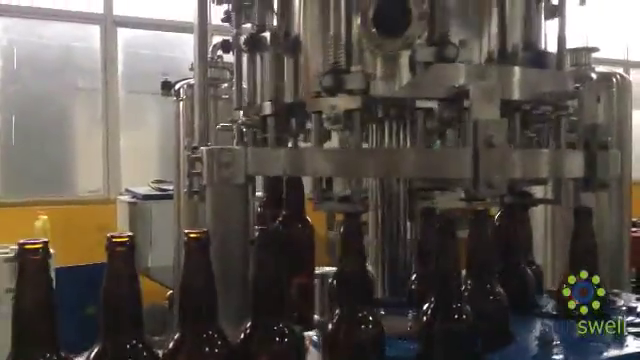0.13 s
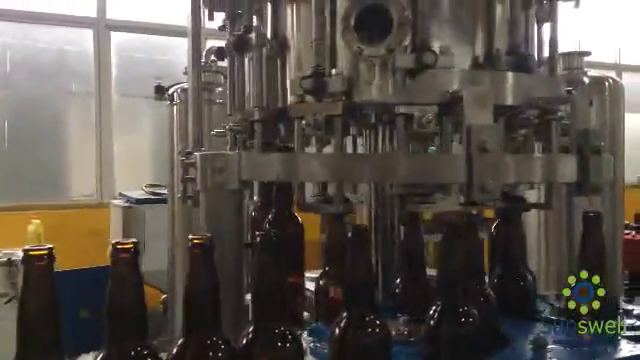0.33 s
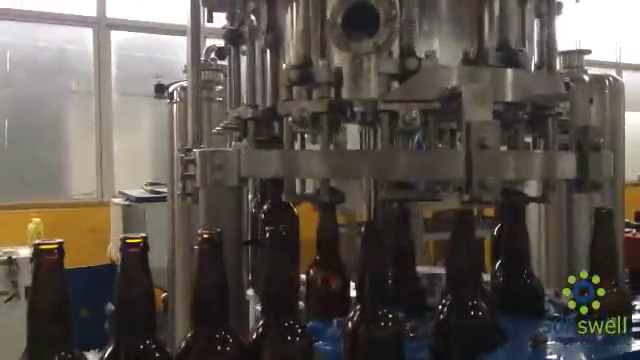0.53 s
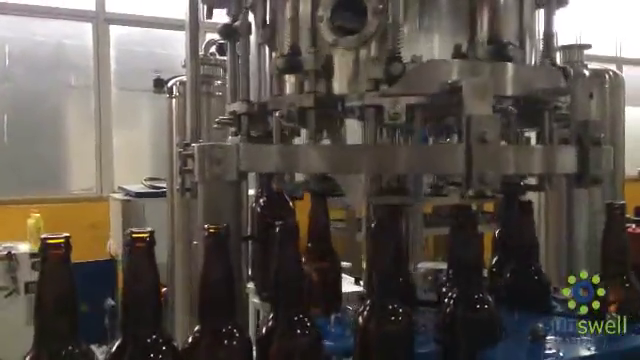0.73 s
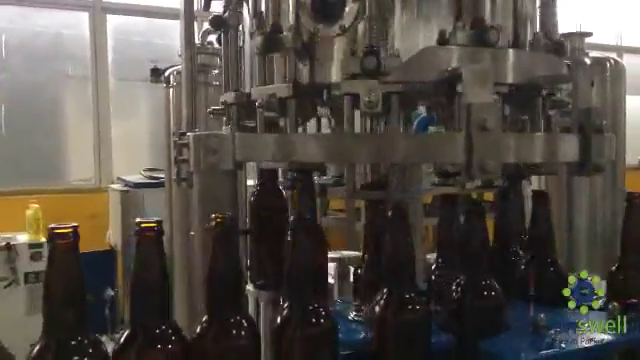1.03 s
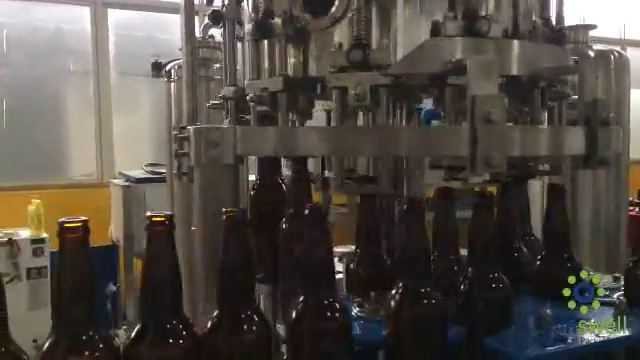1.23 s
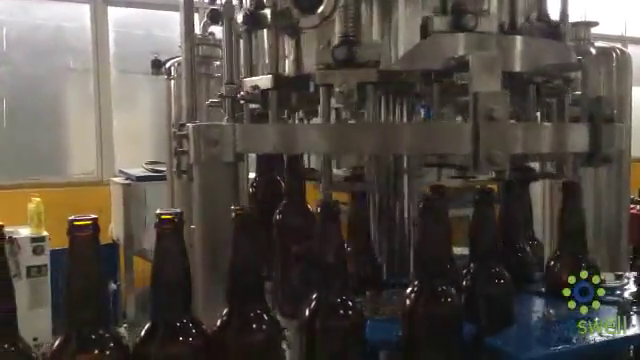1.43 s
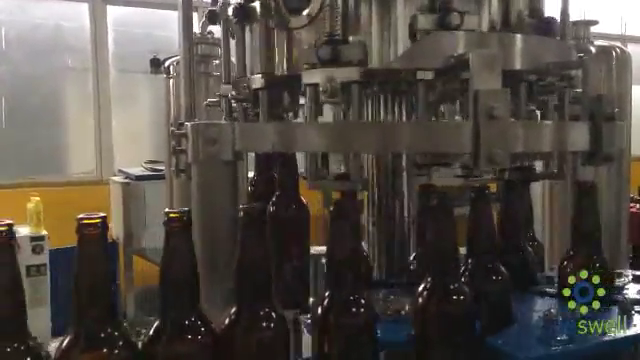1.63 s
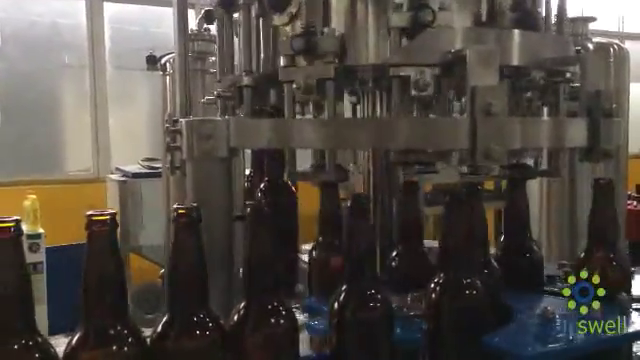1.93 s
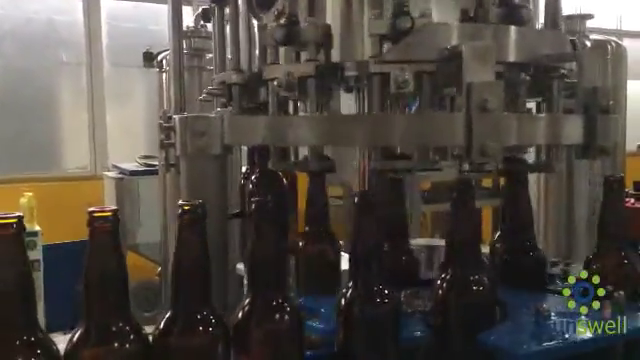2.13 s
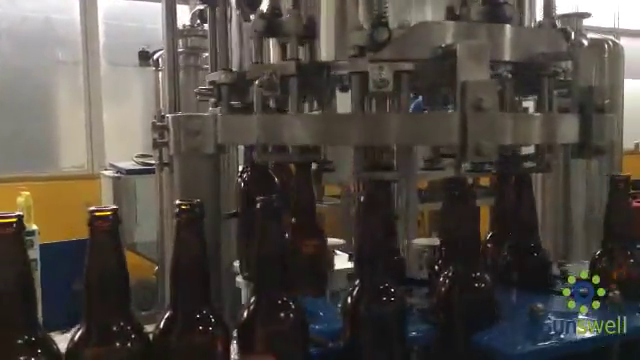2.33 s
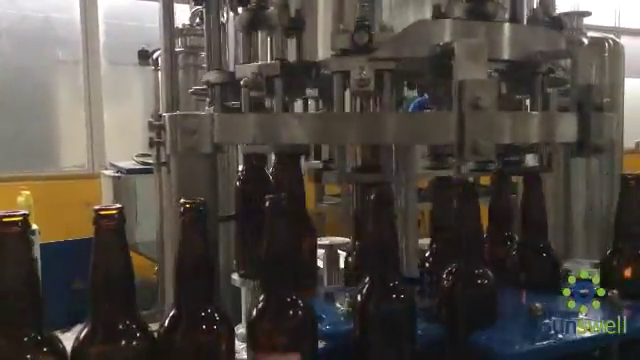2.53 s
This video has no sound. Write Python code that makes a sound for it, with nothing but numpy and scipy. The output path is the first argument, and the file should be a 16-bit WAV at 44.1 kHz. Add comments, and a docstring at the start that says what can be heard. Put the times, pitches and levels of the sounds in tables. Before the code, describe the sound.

Glass bottles clink close by: a rapid clattering cluster at 0.16-0.22 s, a strong ringing knock at 1.2 s, another cluster at 2.2-2.36 s, with weaker taps and faint jostling between. High steel pings with brief air puffs come at 1.05 and 2.6 s. Throughout, air and spray hiss brightly with faint whistles over unsteady motor hum and low rumble, in a weakly echoing hard-walled hall, mono.

```python
"""Glass bottles knock and ring close to the microphone, about once a second, as a filling machine runs.
Twice a steel part of the filler snaps over with a high ping and a puff of air; other bottles jostle faintly.
Blows are dying sines with a burst of contact noise, and a hard-walled hall answers them weakly.
Behind them lie the shaped noise of air and spray, faint whistles, a rumble and the unsteady hum of the drive."""
import sys
import numpy as np
from scipy import signal
from scipy.fft import rfft, irfft
from scipy.io import wavfile
from scipy.ndimage import uniform_filter1d

SR = 44100
rng = np.random.default_rng(int(sys.argv[2]) if len(sys.argv) > 2 else 0)


def unload_audio(sound):
    """Save the sound as a 16-bit wav file, at the path given as the first command line argument."""
    columns = np.transpose(np.atleast_2d(sound))
    # keep every value between -1 and 1, then stretch to whole-number steps
    steps = np.round(np.clip(columns, -1, 1) * 32767)
    wavfile.write(sys.argv[1], SR, steps.astype(np.int16))


N = 119070  # 2.7 s

# bottle collisions: start_s, ring_db, knock_db, tilt_db (per octave, positive favours the treble), crack_db
COLLISIONS = [(.1625, -21.5, -19, 13, -22), (.1716, -18, -13.5, 3, -4.5), (.1872, -25, -50, 13, -25),
              (.195, -15.5, -42, -3, -30), (.203, -21, -27, 3, -21), (0.2204, -19, -42, -5, -28),
              (.3576, -29.5, -35, 11, -19.5), (.553, -33, -23.5, 0, -36), (.65, -37, -30, -2, -36),
              (.9792, -48, -35, 2, -23), (1.1812, -33, -15.5, 19, -10), (1.1862, -9, -21, -5, -7.5),
              (1.226, -47, -25, 1, -36), (1.287, -26.5, -24.5, -4, -32), (1.495, -24, -42, -16, -36),
              (1.69, -27, -25.5, -8, -34), (1.978, -32, -22.5, -4, -39), (2.1960, -17.5, -11.5, 6, -9),
              (2.238, -28, -30, -4, -34), (2.2852, -21.5, -34, 0, -24), (2.312, -18.5, -37, -6, -34),
              (2.342, -22, -27, 4, -32), (2.364, -31, -46, 14, -32)]
# ringing modes of two touching bottles: pitch_hz, level_db (within the ring), t60_s
GLASS_MODES = [(2856, -1.5, .27), (3459, 0, .28), (2885, -12, .1), (3410, -12, .1), (4490, -17, .1),
               (5170, -5, .075), (5310, -4, .075), (6660, -10, .07), (6760, -10, .08), (8520, -23, .06),
               (10900, -27, .05)]
DAMPING_DB = -14  # a contact of this strength halves the ring that is still sounding
CONTACT_S = 0.0032  # decay time constant of the crack between bottles


def bottles():
    """Each collision damps the old ring, then cracks, knocks and sets the glass ringing anew."""
    glass, blows = np.zeros(N), np.zeros(N)
    for start_s, ring_db, knock_db, tilt_db, crack_db in COLLISIONS:
        glass[round(start_s * SR):] /= 1 + amp(ring_db - DAMPING_DB)
        add(glass, start_s, amp(ring_db) * ring(GLASS_MODES, 1, tilt_db))
        blow = amp(knock_db) * knock(0.96) + amp(crack_db) * crack(CONTACT_S)
        add(blows, start_s, blow)
    return glass + blows


# damped modes of a bottle held against the guide: pitch_hz (before the pitch factor), level_db (relative)
KNOCK_MODES = [(950, -17), (1335, -8.5), (1530, -3.5), (1745, -6.5), (1810, -2.5), (2040, -10)]
KNOCK_T60_S = .07


def knock(pitch):
    """The short, dull body of a collision: damped modes that all die alike."""
    modes = [(hz, level_db, KNOCK_T60_S) for hz, level_db in KNOCK_MODES]
    return ring(modes, pitch)


# colour of the contact crack: pitch_hz, level_db (relative)
CRACK_COLOUR = [(400, -22.5), (1500, -4.5), (2300, -7.5), (3200, 0), (5500, -1), (7000, -5), (9000, -5.5),
                (15000, -13)]


def crack(decay_s):
    """The brief noisy contact of two hard things: coloured noise under an exponential decay."""
    t = np.arange(SR // 2) / SR
    rough = unit(colour(rng.standard_normal(len(t)), CRACK_COLOUR))
    return rough * np.exp(-t / decay_s)


RING_RISE_S = 0.00043  # time constant of the onset


def ring(modes, pitch, tilt_db=0, split_hz=0):
    """Dying sines after a blow, tilted towards the treble or the low modes; split modes beat."""
    t = np.arange(SR // 2) / SR
    first_hz = modes[0][0]
    out = np.zeros(len(t))
    for hz, level_db, t60_s in modes:
        level = amp(level_db + tilt_db * np.log2(hz / first_hz))
        decay = np.exp(-np.log(1000) * t / t60_s)
        out += level * decay * np.sin(2 * np.pi * hz * pitch * t)
    rise = 1 - np.exp(-t / RING_RISE_S)
    beat = np.cos(np.pi * split_hz * t)  # turns each sine into a pair split_hz apart
    return out * rise * beat


# snaps of the steel part: start_s, level_db, pitch_hz, gap_hz (within each pair of modes), t60_s
PING_EVENTS = [(1.0462, -6.5, 5240, 45, 0.22), (2.5966, -8.5, 5329, 5.5, 0.29)]
# modes of the steel part: pitch_ratio, level_db (relative)
STEEL_MODES = [(0.998, 1), (1.012, -24), (1.763, -19), (2.008, -14), (2.38, -19)]
SNAP_DB, SNAP_S = -8, 0.005  # contact crack: level against the ping, decay time constant
# air let out: start_s, length_s, level_db
AIR_PUFFS = [(1.038, 0.055, -27), (2.592, 0.073, -23)]
# colour of the puffs: pitch_hz, level_db (relative)
PUFF_COLOUR = [(500, -27), (1500, -5.5), (2900, 13), (4500, 0), (7000, -4), (11000, 2.5), (15000, -20)]


def filler():
    """A steel part snaps over and its paired modes ring; air escapes with it as shaped noise."""
    out = np.zeros(N)
    for start_s, level_db, pitch_hz, gap_hz, t60_s in PING_EVENTS:
        modes = [(ratio, mode_db, t60_s) for ratio, mode_db in STEEL_MODES]
        ping = ring(modes, pitch_hz, split_hz=gap_hz)
        snap = amp(SNAP_DB) * crack(SNAP_S)
        add(out, start_s, amp(level_db) * (ping + snap))
    for start_s, length_s, level_db in AIR_PUFFS:
        air = unit(colour(rng.standard_normal(N), PUFF_COLOUR))[:int(length_s * SR)]
        swell = signal.windows.tukey(len(air), .5)
        add(out, start_s, amp(level_db) * air * swell)
    return out


JOSTLE_PER_S, JOSTLE_DB, JOSTLE_SPREAD_DB = 45, -40.5, 3.5  # mean rate, level, scatter of strength
JOSTLE_KNOCK_DB, JOSTLE_CRACK_DB = 2.5, 7.5  # against the level of the jostle


def jostle(count=10):
    """Bottles of slightly different pitch touch lightly at random on the conveyor."""
    out = np.zeros(N)
    for _ in range(count):
        struck = rng.random(N) < JOSTLE_PER_S / count / SR
        strength = amp(JOSTLE_SPREAD_DB * np.minimum(rng.exponential(1, N), 3))
        pitch = 1 + .025 * rng.uniform(-0.564, 1)
        touch = ring(GLASS_MODES, pitch, tilt_db=-2)
        touch += amp(JOSTLE_KNOCK_DB) * knock(pitch)
        touch += amp(JOSTLE_CRACK_DB) * crack(CONTACT_S)
        out += signal.oaconvolve(struck * strength, touch)[:N]
    return amp(JOSTLE_DB) * out


# hiss of the air jets and the spray, before its swell: pitch_hz, density_db (per Hz)
HISS_DENSITY = [(20, -110), (1000, -90.5), (2200, -70), (2850, -60), (3550, -59.5), (3900, -63.5),
                (4480, -60), (4750, -62), (5150, -60), (6300, -60.5), (7200, -64), (8400, -59.5),
                (10000, -60), (10700, -60.5), (11200, -59.5), (12200, -64), (13500, -59), (14400, -63.5),
                (15400, -63)]
# swell of the hiss: start_s, level_db
HISS_SWELL = [(0, 0.5), (.3, 0), (.45, -1.8), (.53, 0.9), (.8, .5), (1.0, .5), (1.1, 1.5), (1.25, -0.1),
              (1.42, -1), (1.6, 0), (1.8, -0.2), (1.97, 0.9), (2.15, 0.3), (2.35, -0.5), (2.47, -1.8),
              (2.56, 1), (2.7, -1)]
SPATTER_PER_S, SPATTER_DB = 250, -31  # mean rate of droplets, rms level before the swell
SPATTER_SPREAD_DB = -2  # scatter of droplet strength, downward
TREBLE_FROM_HZ, TREBLE_SWELL = 7500, 0.91  # the top of the hiss follows only this share of the swell


def spray():
    """Air and water hiss as noise that swells a little; random droplets spatter as tiny cracks."""
    swell_db = np.interp(np.arange(N) / SR, *np.transpose(HISS_SWELL))
    landed = rng.random(N) < SPATTER_PER_S / SR
    strength = amp(SPATTER_SPREAD_DB * np.minimum(rng.exponential(1, N), 4))
    drops = signal.oaconvolve(landed * strength, crack(decay_s=0.00092))[:N]
    air = noise(HISS_DENSITY, patchy_db=1.2) + amp(SPATTER_DB) * unit(drops)
    high_pass = signal.butter(2, TREBLE_FROM_HZ, "high", fs=SR, output="sos")
    treble = signal.sosfiltfilt(high_pass, air)
    return amp(swell_db) * (air - treble) + amp(TREBLE_SWELL * swell_db) * treble


# faint whistles of the air jets: pitch_hz, width_hz, level_db (rms)
JET_WHISTLES = [(4030, 25, -41), (4250, 40, -43.5), (4380, 77, -40)]


def whistles():
    """Narrow, fuzzy tones in the escaping air: sines whose level and phase wander."""
    t = np.arange(N) / SR
    out = np.zeros(N)
    for pitch_hz, width_hz, level_db in JET_WHISTLES:
        wander = drift(width_hz / 2) + 1j * drift(width_hz / 2)
        out += amp(level_db) * (wander * np.exp(2j * np.pi * pitch_hz * t)).real
    return out


# hum of the mains and of the drive: pitch_hz, level_db (rms of the steady part), unsteadiness (share)
HUM_LINES = [(99.8, -54, .4), (145, -57, .6), (526.8, -41.5, .25), (551, -51, .4), (575, -48, .3),
             (602.3, -45.2, .3), (626, -46, .25), (827, -56.5, .5)]
WAVER_HZ = 3  # how fast the hum wavers
# low rumble of the line, before its level curve: pitch_hz, density_db (per Hz)
BASS_DENSITY = [(5, -125), (22, -94), (35, -97), (55, -75.5), (120, -73.5), (165, -65.5), (270, -75),
                (450, -75.5), (2000, -110)]
# level of the low rumble: start_s, level_db
BASS_SWELL = [(0, -2), (.16, 4.5), (.4, 0.5), (.8, 2.5), (1.1, -2), (1.38, -1), (1.58, 2.5), (1.9, 5.5),
              (2.2, -0.5), (2.5, 0), (2.62, 1.5)]
# steady noise of the machinery: pitch_hz, density_db (per Hz)
MACHINE_DENSITY = [(20, -100), (150, -79), (280, -70), (430, -71), (600, -64.5), (780, -68.5),
                   (1150, -67.5), (1450, -66), (1850, -70.5), (2150, -69), (4000, -87.5), (16000, -100)]


def drive():
    """Unsteady lines of the motor and gears, sines wavering about a steady part, over rumbling noise."""
    t = np.arange(N) / SR
    hum = np.zeros(N)
    for pitch_hz, level_db, unsteadiness in HUM_LINES:
        waver = np.sqrt(2) + unsteadiness * (drift(WAVER_HZ) + 1j * drift(WAVER_HZ))
        line = np.exp(2j * np.pi * (pitch_hz * t + rng.random()))
        hum += amp(level_db) * (waver * line).real
    bass_db = np.interp(t, *np.transpose(BASS_SWELL))
    bass = amp(bass_db) * noise(BASS_DENSITY, patchy_db=1)
    return hum + bass + noise(MACHINE_DENSITY, patchy_db=2.5)


# decay of the hall: pitch_hz, t60_s
HALL_DECAY = [(100, 0.39), (1500, 1), (4000, 0.45), (15000, 0.1)]
HALL_DB = -19  # energy of the tail against the direct sound
NEAR_DB, NEAR_S = -12.5, .016  # reflections: summed energy against the direct sound, time they span


def hall(x, count=8):
    """Quick reflections off the steel machine, and the tail of the hall as noise dying by pitch."""
    hz, t, z = signal.stft(rng.standard_normal(SR), SR, nperseg=256)
    decay = np.exp(-np.log(1000) * t / read(HALL_DECAY, hz)[:, None])
    tail = signal.istft(z * decay, SR, nperseg=256)[1]
    response = amp(HALL_DB) * tail / np.linalg.norm(tail)
    for when, sign in rng.random((count, 2)):
        reflection = np.sign(sign - .5) * amp(NEAR_DB) / np.sqrt(count)
        add(response, .002 + when * NEAR_S, np.array([reflection]))
    return x + signal.fftconvolve(x, response)[:N]


def noise(points, patchy_db):
    """Noise of a given density per Hz, with short-lived patches in time and pitch."""
    frames = dict(nperseg=512, noverlap=384)
    _, _, z = signal.stft(rng.standard_normal(N), SR, **frames)
    patches = uniform_filter1d(rng.standard_normal(z.shape), size=7, axis=0)  # along pitch
    patches = unit(uniform_filter1d(patches, size=14, axis=1))  # along time
    x = signal.istft(z * amp(patchy_db * patches), SR, **frames)[1][:N]
    return colour(x, points) * np.sqrt(SR / 2)  # white noise of density 1 per Hz before the colour


def drift(hz):
    """Slow random motion of rms 1: noise under a Gaussian low-pass."""
    low_pass = np.exp(-(np.fft.rfftfreq(N, 1 / SR) / hz) ** 2)
    return unit(irfft(rfft(rng.standard_normal(N)) * low_pass, N))


def colour(x, points):
    """Filters x by a table of levels over pitch."""
    gain = amp(read(points, np.fft.rfftfreq(len(x), 1 / SR)))
    return irfft(rfft(x) * gain, len(x))


def read(points, hz):
    """Reads a table on a log-frequency axis."""
    table_hz, value = np.transpose(points)
    return np.interp(np.log(hz + 1), np.log(table_hz + 1), value)


def add(mix, start_s, sound):
    """Mixes a sound in from its start time."""
    part = mix[max(round(start_s * SR), 0):][:len(sound)]
    part += sound[:len(part)]


def amp(db):
    """Turns decibels into an amplitude factor."""
    return 10 ** (np.asarray(db) / 20)


def unit(x):
    """Scales to rms 1."""
    return x / np.sqrt(np.mean(x ** 2) + 1e-20)


def scene():
    """The whole line in mono on both channels; the hall answers only the bottles and the filler."""
    struck = hall(bottles() + jostle() + filler())
    mono = struck + spray() + whistles() + drive()
    return np.array([mono, mono])


HEADROOM = .9  # ceiling of the rounded peaks, before the band limit
EDGE_HZ = 15380  # upper band limit


def record(dry):
    """The loudest peaks are rounded off; then a steep low-pass sets the recorder's band limit."""
    held = dry / (1 + (dry / HEADROOM) ** 8) ** (1 / 8)
    low_pass = signal.firwin(601, EDGE_HZ, window=("kaiser", 9), fs=SR)
    return signal.oaconvolve(held, low_pass[None], "same")


dry = scene()
out = record(dry)
unload_audio(out)
```